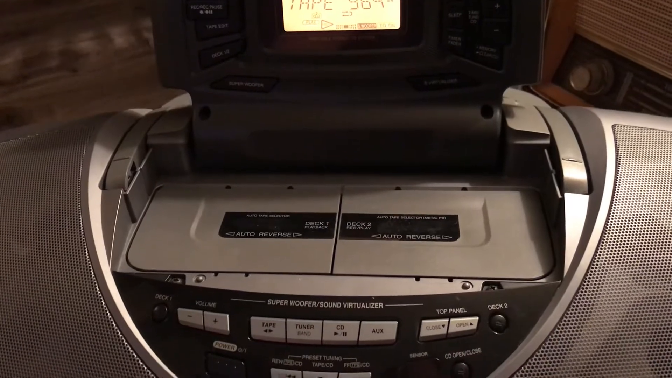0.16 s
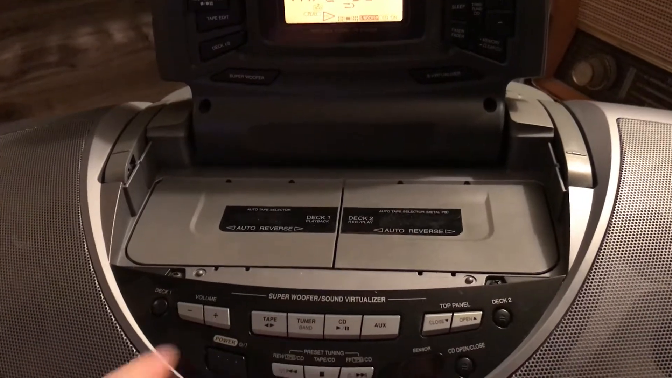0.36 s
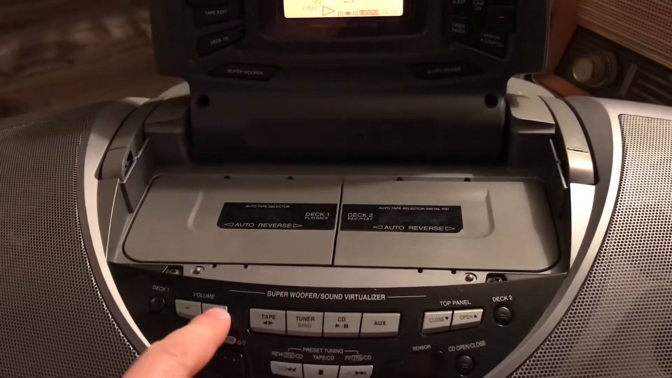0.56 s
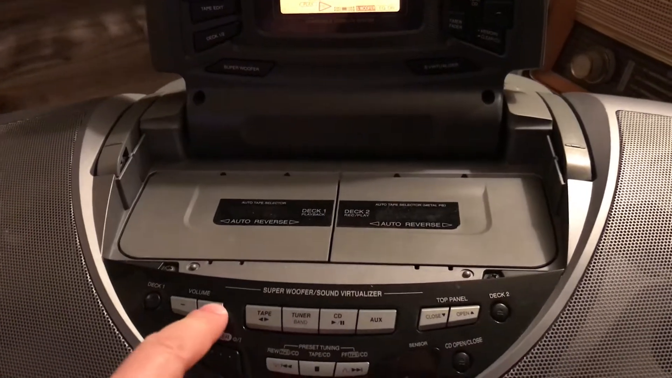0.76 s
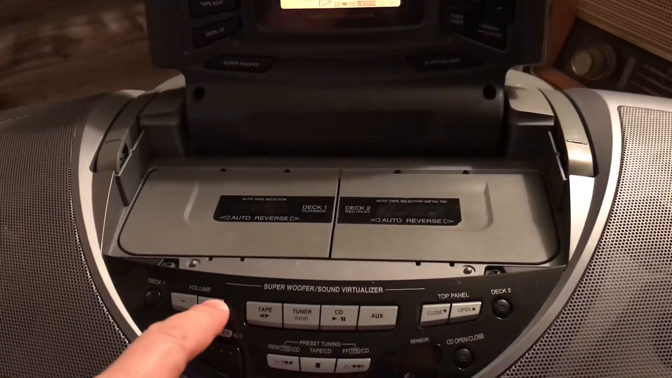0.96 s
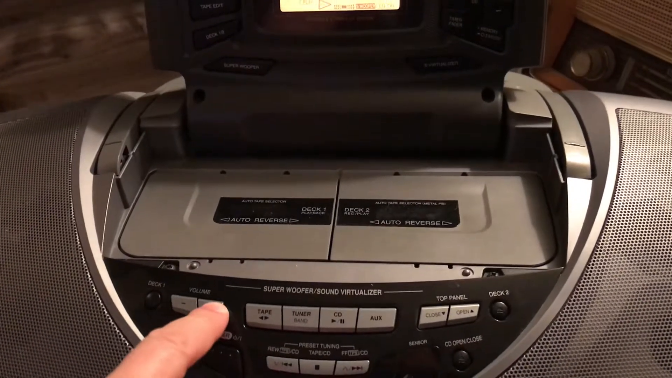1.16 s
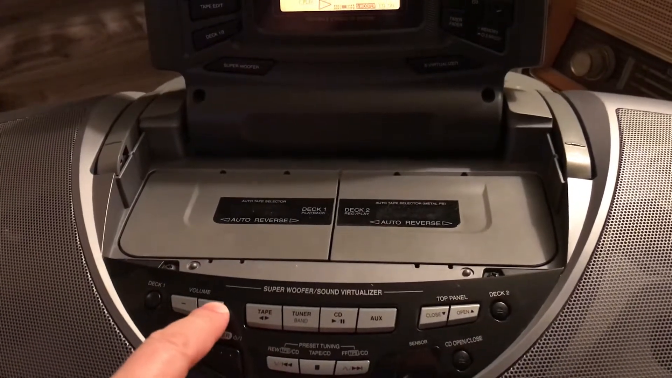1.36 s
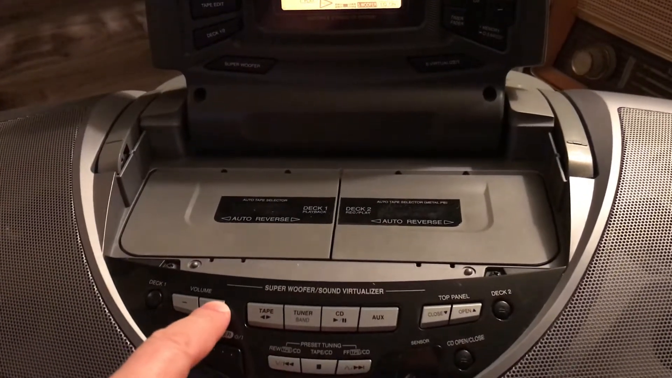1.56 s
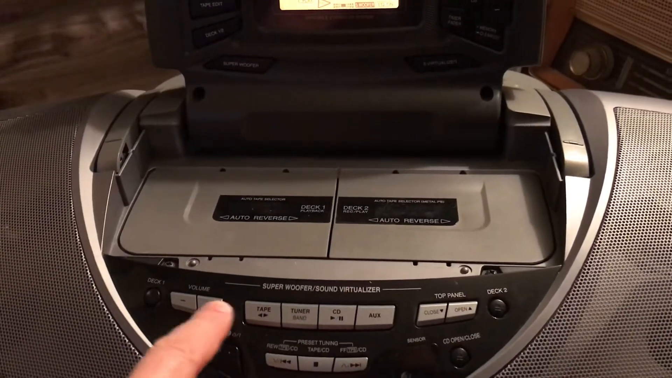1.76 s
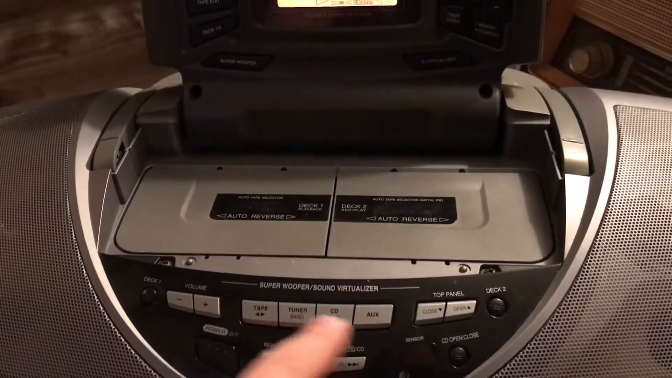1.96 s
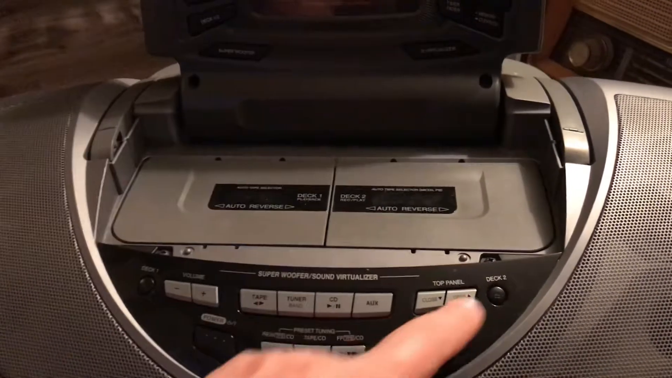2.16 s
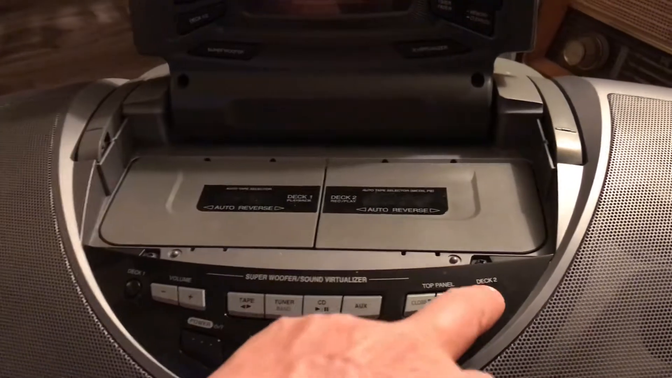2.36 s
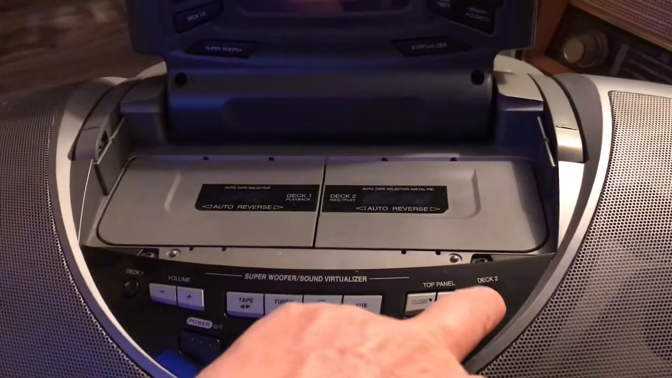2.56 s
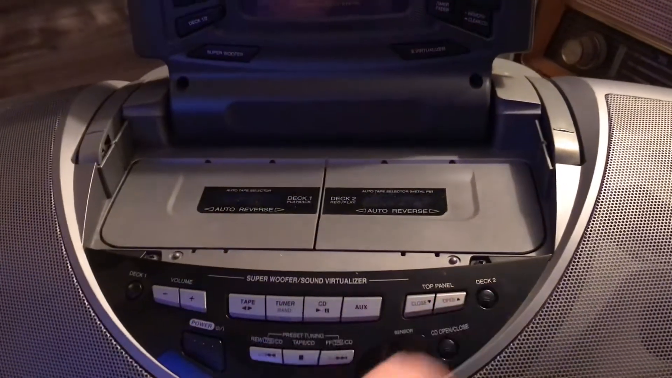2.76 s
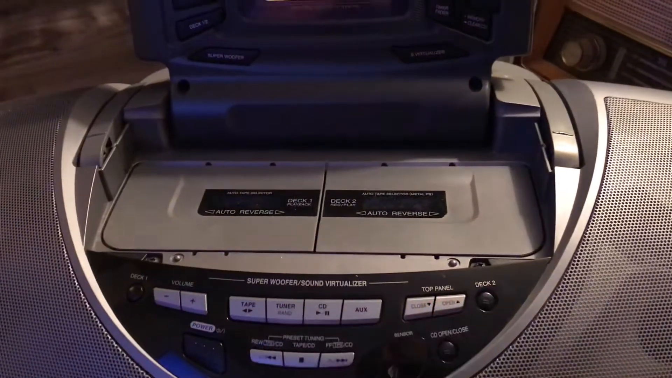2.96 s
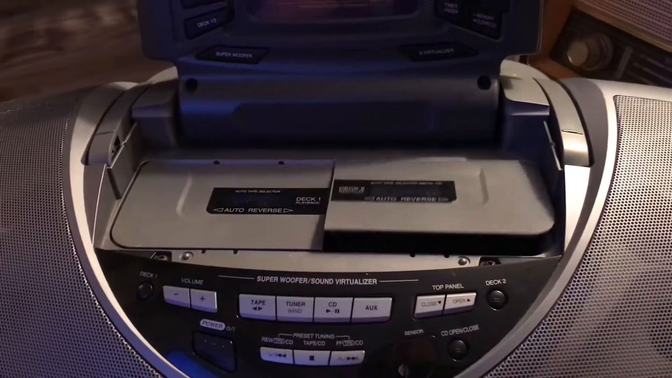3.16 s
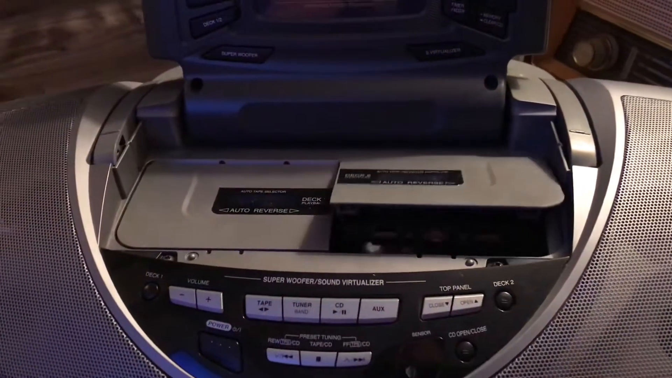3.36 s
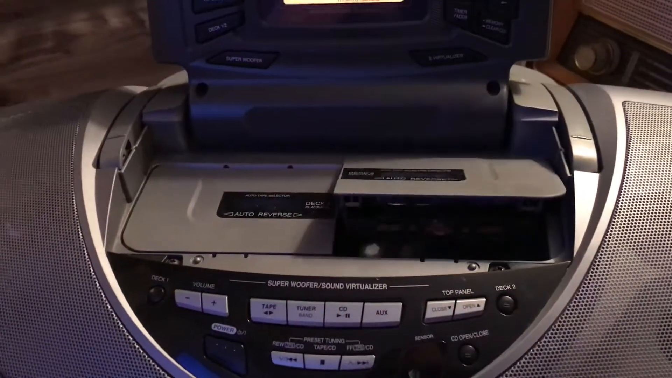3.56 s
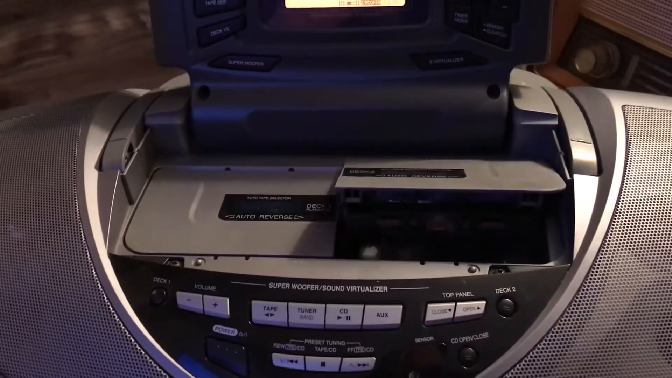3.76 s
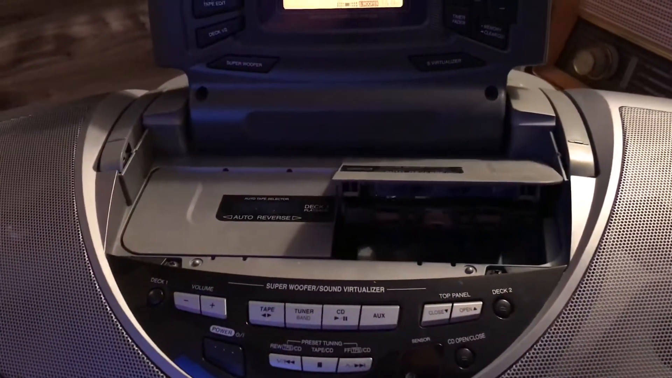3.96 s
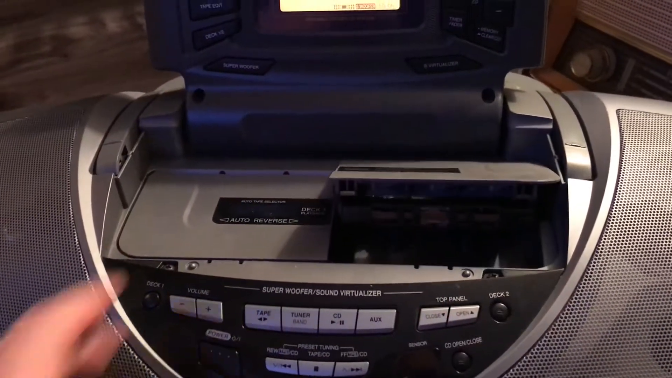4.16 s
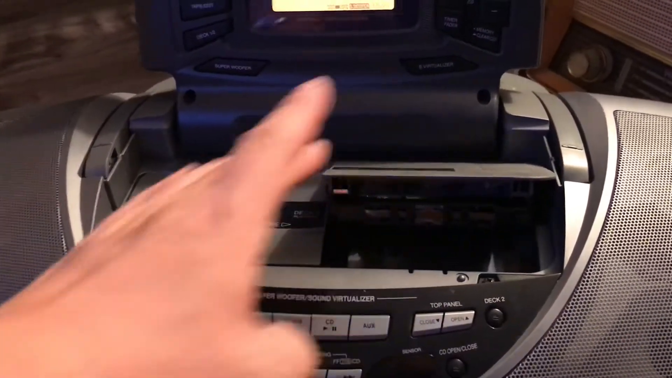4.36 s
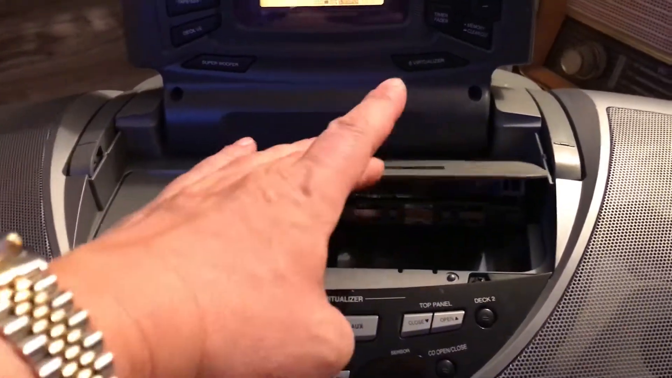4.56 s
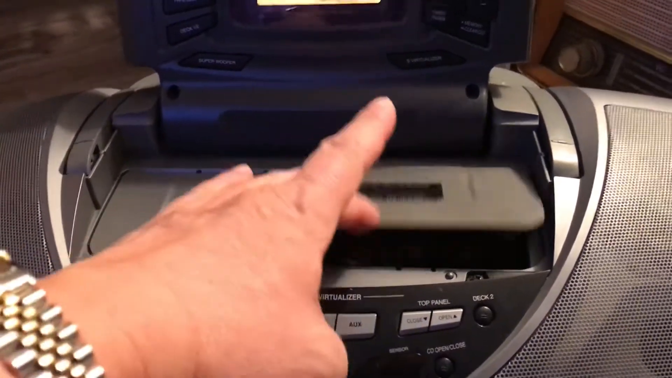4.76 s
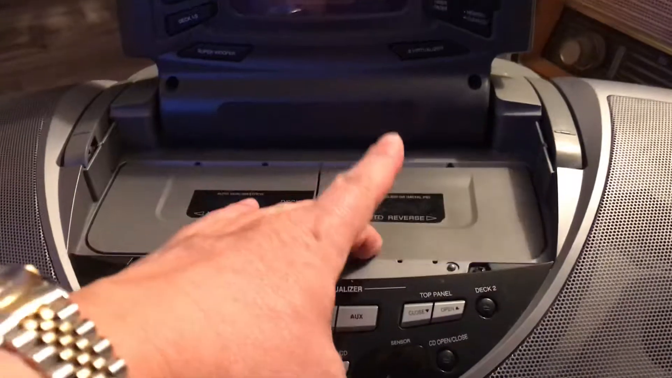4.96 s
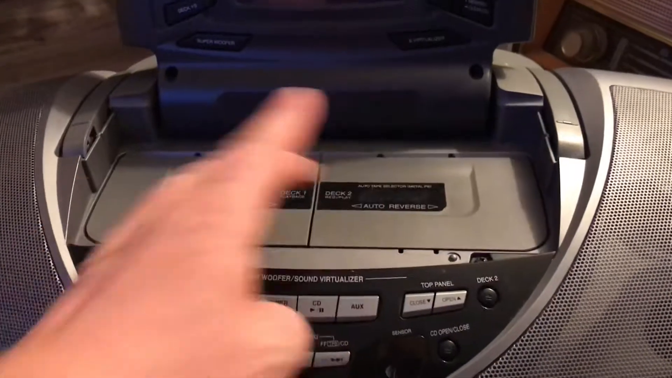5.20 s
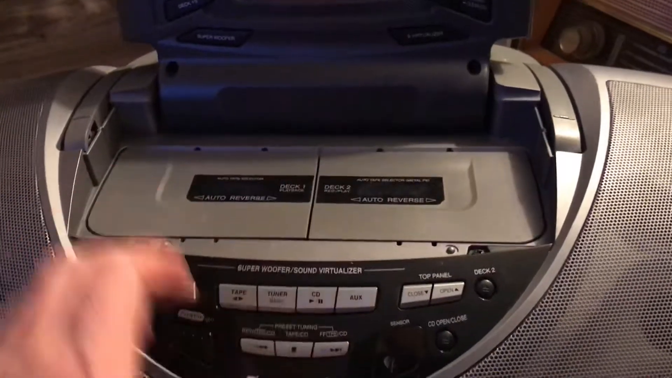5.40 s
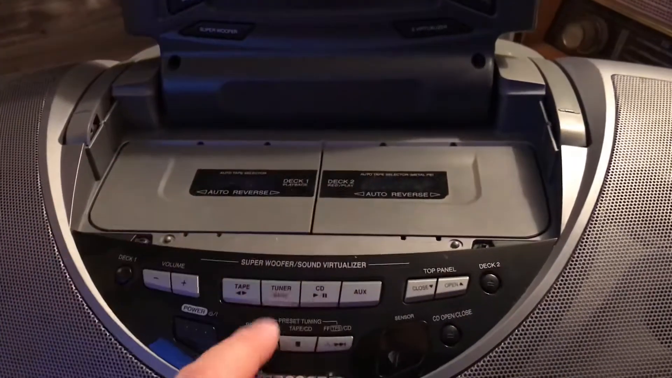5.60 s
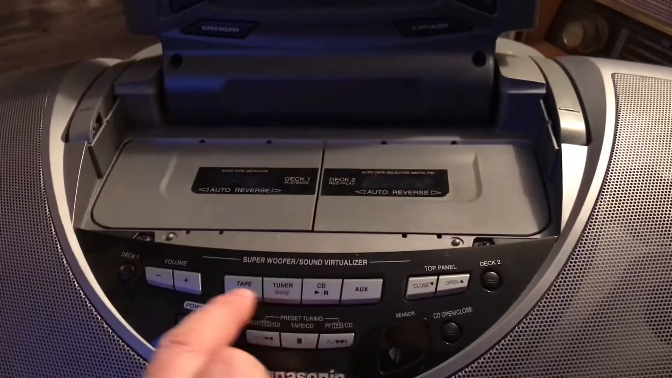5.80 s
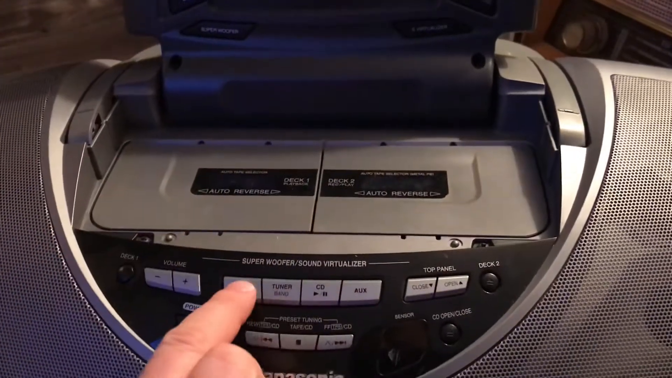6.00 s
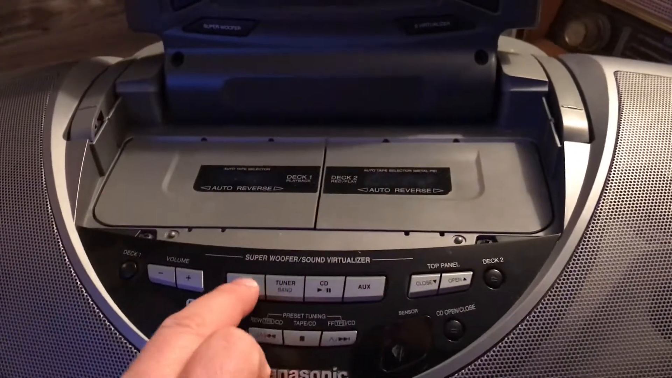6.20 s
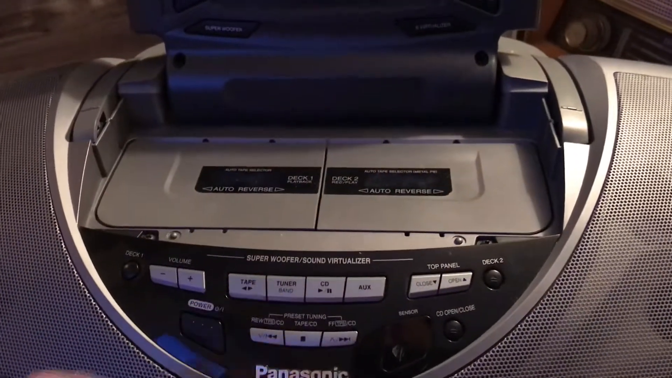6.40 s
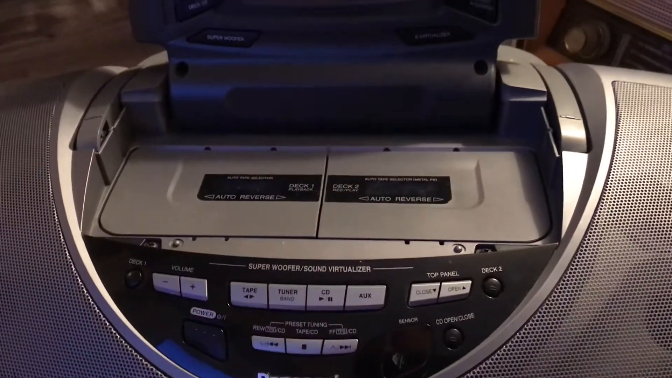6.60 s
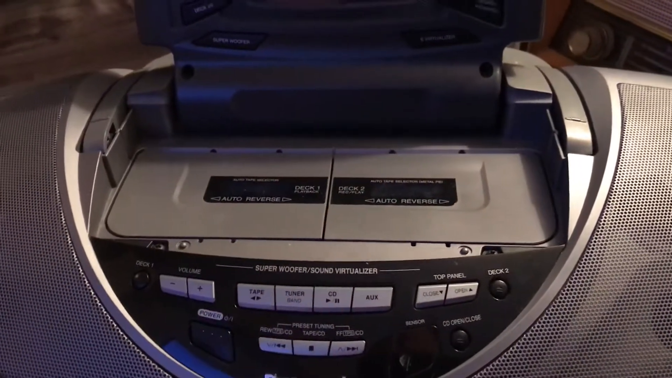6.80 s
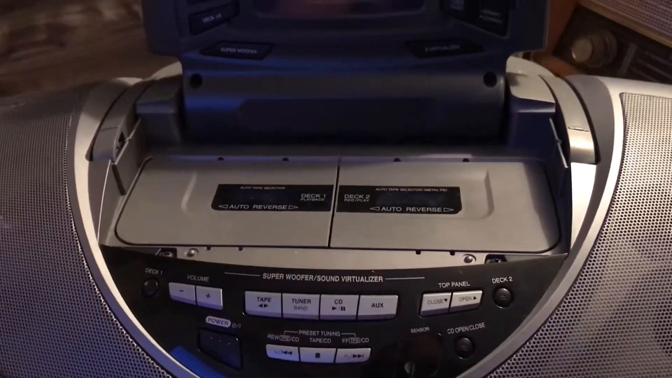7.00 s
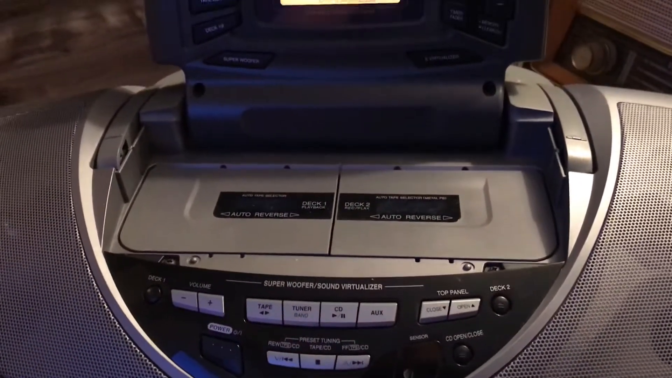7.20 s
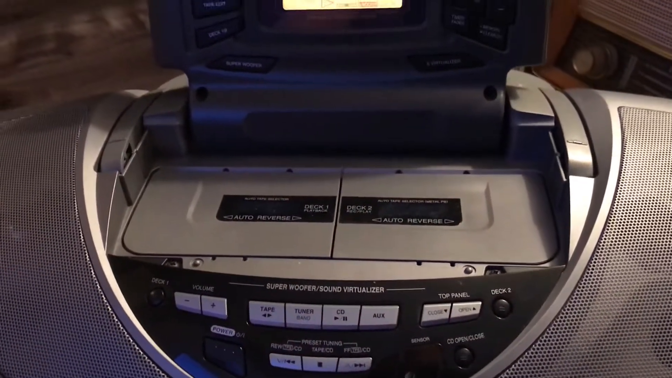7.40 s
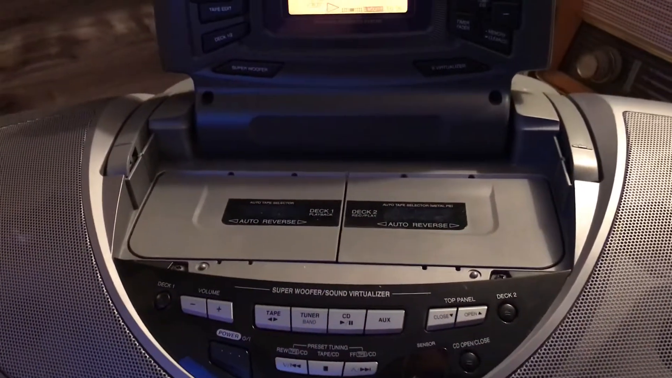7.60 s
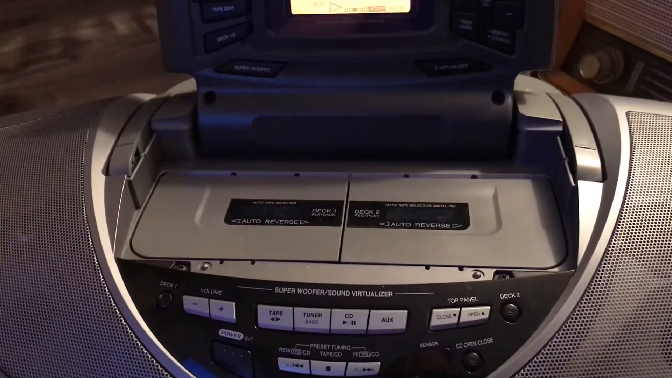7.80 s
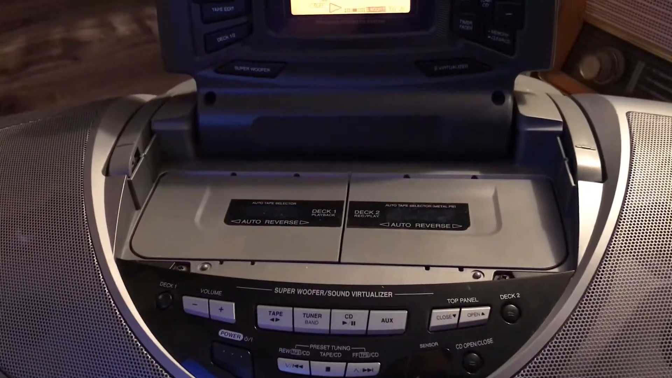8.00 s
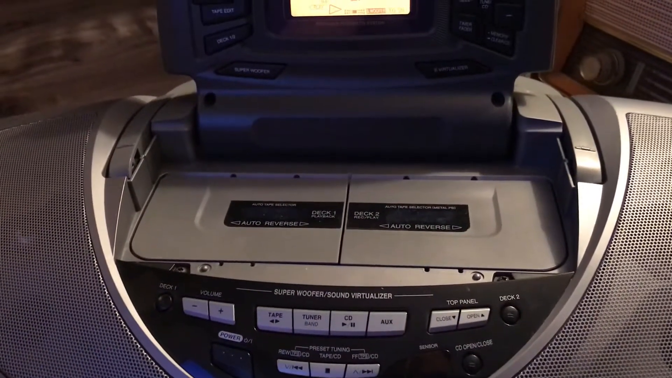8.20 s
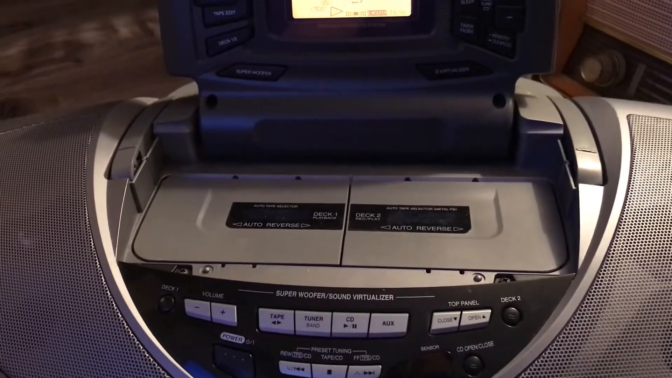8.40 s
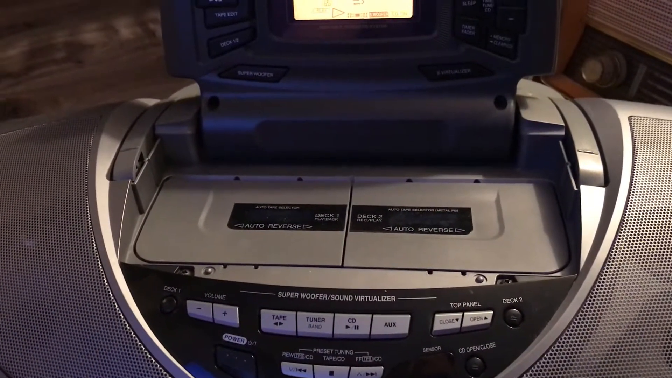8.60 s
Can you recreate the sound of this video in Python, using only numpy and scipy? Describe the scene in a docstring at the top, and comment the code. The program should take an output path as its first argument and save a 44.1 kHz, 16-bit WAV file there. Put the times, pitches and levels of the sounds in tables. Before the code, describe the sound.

A cassette player is heard very close in a small quiet room, with low rumble, a trace of mains hum and faint high tape hiss. A soft finger bump at 0.5 s leads to three small crisp key clicks at about 0.8, 1.1 and 1.3 s, with duller bumps between and after. From 1.8 to 2.3 s a hand rustles lightly over plastic. A key clicks at 2.4 s; the hiss stops near 2.6 s as levers clack and thump in quick irregular succession, with a strong unlatching snap at 3.1 s and the sprung door hitting its stop at 3.3 s. Quiet follows. A tiny brush at 4.5 s, grating from 4.7 s, then a loud sharp door snap at 4.9 s with short echo. Faint taps at 5.1 and 5.5 s. A firm key click at 6.0 s, softer release, and mechanism clunks from 6.3 to 6.6 s. Faint hiss resumes around 6.9 s until the end at about 8.5 s.

```python
"""A portable cassette player, close up in a small room. A finger clicks its panel keys, the tape mechanism
clatters to a stop and unlatches the door, which springs open. A hand brushes the panel and snaps the door
shut, a key is pressed, the mechanism clunks back into play and the running tape hisses faintly.
Each contact is a short ring of pure tones and dying noise, with a room echo. Tape hiss, hand rustle and
room sound are filtered noise, and the room adds a trace of mains hum."""
import sys
import numpy as np
from scipy import signal
from scipy.fft import rfft, irfft, next_fast_len
from scipy.io import wavfile
from scipy.ndimage import uniform_filter1d

SR = 44100
rng = np.random.default_rng(int(sys.argv[2]) if len(sys.argv) > 2 else 0)


def inscribe(sig):
    """Save sig as 16-bit PCM at rate SR to the path in sys.argv[1].

    A 1-D sig is mono; a 2-D sig holds one channel per row.
    Samples are clipped to [-1, 1] before scaling.
    """
    pcm = np.round(np.clip(np.atleast_2d(sig).T, -1, 1) * 32767)
    wavfile.write(sys.argv[1], SR, pcm.astype(np.int16))


N = 381465  # length in samples

# The thud, knock, clack and crack bands of a contact: (low edge [Hz], high edge [Hz])
BANDS = [(90, 400), (400, 1500), (1500, 6000), (6000, 16000)]


def keys():
    """Small switches snap under the panel keys; a finger landing or letting go makes softer bumps."""
    # A switch snaps under a key: (time [s], strength [dB], pitch of the struck part [Hz])
    snaps = [(0.7805, -45.5, 3280), (1.0822, -43.7, 3340), (1.3339, -43.8, 3360), (2.4075, -44.4, 1140),
             (6.0211, -39, 2950)]
    # A finger lands on a key or lets it back up: (time [s], strength [dB], pitch of the struck part [Hz])
    bumps = [(0.5445, -62.5, 1050), (0.9611, -50, 616), (1.2354, -52, 640), (1.5604, -52, 583),
             (2.5525, -46.5, 855), (6.161, -42.7, 462)]
    # Sound of each touch, relative to its strength, with the rise time of a usual blow:
    # (thud [dB], knock [dB], clack [dB], crack [dB], rise [s])
    snap_touch = (-11, -3, -4, -9.5, 0.0003)
    bump_touch = (-4.5, -4, -15, -28, 0.0033)
    # Tones the keys ring with: (pitch [Hz], relative level [dB], time to fall 60 dB [s])
    modes = [(363, -3, 0.15), (576.5, 7.5, 0.094), (740, -20, 0.14), (845, 1.5, 0.13), (1127, 3, 0.14),
             (1825, 6.5, 0.16), (2000, 7.5, 0.023), (2650, -5, 0.089), (3350, -26, .05), (4130, 12, 0.036),
             (5220, -5, .05)]
    # The crowd of weaker tones: (frequency [Hz], relative level [dB per Hz])
    body = [(50, -36), (150, -26), (400, -13), (580, 0), (800, -1.5), (960, -10), (1190, 0), (1600, -7.5),
            (2800, -1), (4200, -11), (6500, -22.5), (10000, -42.5), (14000, -36), (16000, -33.5)]
    blows = [blow(snap_touch, *row) for row in snaps]
    blows += [blow(bump_touch, *row) for row in bumps]
    return contacts(blows, modes, body, modes_db=-8, part_db=-5, rattle_db=1.5,
                    life=1.18, wet_db=-4.0, level_db=-0.6)


def drive():
    """The mechanism shifts its levers to stop, to eject and to play, with hard snaps and soft bumps."""
    # Levers and the door latch snap over:
    # (time [s], strength [dB], pitch of the struck part [Hz], sharpness of the edge [dB])
    snaps = [(2.6565, -59, 5000, 2), (2.6602, -49, 1600, -2.5), (2.684, -55.5, 3170, -6),
             (2.714, -40.5, 3130, 2.3), (2.7335, -52, 3150, -1.5), (2.8586, -48.5, 3100, 0),
             (2.9165, -40.5, 1090, -2), (3.056, -62, 2440, 3), (3.0662, -48.3, 1930, -1),
             (3.0783, -33.3, 1920, -5), (3.1035, -49.5, 3740, 4.5), (3.119, -46, 5500, -3),
             (3.1296, -43.5, 3800, 6.5), (6.2705, -58, 5230, 2), (6.2752, -50.5, 2070, 0),
             (6.2889, -52.5, 1900, -5), (6.3308, -46.3, 4190, 4), (6.3365, -49.3, 2200, 0),
             (6.4847, -60.5, 2460, -8), (6.533, -61.5, 3570, -2.5), (6.5645, -58, 2500, -7),
             (6.5862, -47.8, 3150, 1)]
    # The cam and the head carriage bump into place:
    # (time [s], strength [dB], pitch of the struck part [Hz])
    bumps = [(2.668, -39.5, 1550), (2.735, -44, 1100), (2.8083, -51, 3210), (2.8213, -50, 3160),
             (2.8848, -49, 380), (2.9356, -44, 1140), (2.9965, -43, 1750), (6.277, -47, 300),
             (6.2992, -53, 1050), (6.4127, -47, 555), (6.567, -50, 300), (6.587, -39.5, 320)]
    # Sound of each touch, relative to its strength, with the rise time of a usual blow:
    # (thud [dB], knock [dB], clack [dB], crack [dB], rise [s])
    snap_touch = (-1.8, -1.5, -0.5, -1.5, 0.0022)
    bump_touch = (-1, -7, -12.5, -25, 0.003)
    # Tones the mechanism rings with: (pitch [Hz], relative level [dB], time to fall 60 dB [s])
    modes = [(141, -14, 0.23), (193, -6, 0.13), (314, -2, 0.15), (379.6, -2, 0.2), (567, -0.5, 0.11),
             (718, 0.5, 0.053), (1230, -29, .09), (1410, -26, .08), (1910, -3.5, .05), (2490, 0, 0.038),
             (3180, -10, 0.025), (3710, -4, 0.025), (5100, -11, .03)]
    # The crowd of weaker tones: (frequency [Hz], relative level [dB per Hz])
    body = [(40, -24), (85, -9), (130, 13), (350, 7.5), (700, -3), (1200, -1.5), (2200, -5), (3600, -6.5),
            (6000, -12), (8000, -18.5), (13500, -19), (16000, -30)]
    blows = [blow(snap_touch, *row) for row in snaps]
    blows += [blow(bump_touch, *row) for row in bumps]
    return contacts(blows, modes, body, modes_db=-4.5, part_db=2, rattle_db=1.5,
                    life=1.0, wet_db=0.3, level_db=-0.43)


def door():
    """The sprung door and its latch snap and grate; the hand bumping the door is softer."""
    # The door hits its stop, grates on the way down, snaps shut and is let go:
    # (time [s], strength [dB], pitch of the struck part [Hz], sharpness of the edge [dB])
    snaps = [(3.2605, -56.5, 3670, -4), (3.2678, -41.5, 3750, 4.5), (4.736, -61.5, 3560, -4),
             (4.7598, -44, 3530, -6.5), (4.783, -49.5, 4780, -6), (4.799, -55, 3700, -1),
             (4.8445, -60, 3740, -6), (4.885, -42.8, 3640, -3), (4.8935, -25.5, 3650, -0.5),
             (4.901, -39, 5500, 0), (5.4794, -55.3, 2100, -6.5)]
    # The hand bumps the door and the door settles:
    # (time [s], strength [dB], pitch of the struck part [Hz])
    bumps = [(3.272, -52, 300), (4.429, -67, 1400), (4.7703, -42, 690), (4.7997, -46, 536),
             (5.0865, -53, 570), (5.492, -52, 1200)]
    # Sound of each touch, relative to its strength, with the rise time of a usual blow:
    # (thud [dB], knock [dB], clack [dB], crack [dB], rise [s])
    snap_touch = (-8, -2, 0, -2, 0.0015)
    bump_touch = (0, -4, -8.5, -19, 0.003)
    # Tones the door rings with: (pitch [Hz], relative level [dB], time to fall 60 dB [s])
    modes = [(98, -14, .4), (202.7, -8.5, 0.13), (354.4, -0.5, .17), (561.6, -5, .13), (715.4, -6, .1),
             (877, -10.5, .15), (1150, -5.5, .09), (1303, -6.5, 0.12), (1920, -5.5, .06),
             (2070, -8.5, .055), (2300, -7, 0.0505), (2680, -6.5, 0.045), (2899, -3.5, 0.0475),
             (3590, 4, 0.061), (3850, -3.5, .035), (4650, -3.5, .035), (5295, -5, .035),
             (5652, -9.5, 0.032), (5950, -7, 0.03033)]
    # The crowd of weaker tones: (frequency [Hz], relative level [dB per Hz])
    body = [(40, -20.5), (65, -0.5), (100, 6), (180, -6.5), (330, 6.5), (700, -5), (1500, -3), (2200, 1),
            (3800, -2), (5500, -3), (6800, -13.5), (8500, -15.5), (12000, -16), (16000, -22.5)]
    blows = [blow(snap_touch, *row) for row in snaps]
    blows += [blow(bump_touch, *row) for row in bumps]
    return contacts(blows, modes, body, modes_db=-6, part_db=0.5, rattle_db=1.5,
                    life=1.0, wet_db=-1.1, level_db=0.4)


def blow(touch, start_s, strength_db, part_hz, edge_db=0):
    """One contact as (time, four band levels, rise time, part pitch); stronger blows seat faster."""
    # A sharp edge trades knock for crack: (thud, knock, clack, crack [dB per dB of edge])
    edge_tilt = (0, -1, 0, 1)
    part_lift_db = 4  # the band that holds the pitch of the struck part stands out
    usual_db, haste = -45, 0.4  # strength that seats in the given rise time; power by which others differ
    *colour_db, rise_s = touch
    lift_db = [part_lift_db * (low < part_hz <= high) for low, high in BANDS]
    band_db = strength_db + np.add(colour_db, lift_db) + edge_db * np.array(edge_tilt)
    return (start_s, *band_db, rise_s * amp(haste * (usual_db - strength_db)), part_hz)


def contacts(blows, modes, body, modes_db, part_db, rattle_db, life, wet_db, level_db):
    """Each contact rings the small part that is hit, the modes around it and the case; the room answers."""
    # How long the plastic case rings, before the factor life: (frequency [Hz], time to fall 60 dB [s])
    plastic = [(100, 0.2), (350, .11), (900, .072), (3000, 0.065), (7000, .037), (14000, 0.024)]
    # How long the room rings: (frequency [Hz], time to fall 60 dB [s])
    room = [(100, .55), (400, 0.2), (1500, .44), (4000, 0.35), (8000, .29), (15000, .2)]
    # Colour of the room's answer: (frequency [Hz], relative level [dB])
    room_colour = [(100, -6), (400, -3.5), (1500, -9), (4000, -16), (8000, -14), (15000, -21.5)]
    ring_size, part_q = 16384, 8  # samples in a ring; sharpness of the struck part's resonance
    wall_rise_s = 0.008

    out = np.zeros(N + SR)  # spare room for the last echo
    t = np.arange(ring_size) / SR
    wall_t = np.arange(2 * ring_size) / SR
    hz, mode_db, t60 = np.transpose(modes)[:, :, None]
    ringing = np.sin(2 * np.pi * hz * t) * np.exp(-np.log(1000) * t / t60)
    case_t60s = [(f, life * decay) for f, decay in plastic]

    for start_s, *band_db, rise_s, part_hz in blows:
        # the point of contact decides how strongly, and with which sign, each mode is struck
        signs = rng.choice([-1, 1], hz.shape)
        strength = signs * amp(mode_db + 2.5 * rng.standard_normal(hz.shape))
        tones = unit(np.sum(strength * ringing, axis=0))
        # loose pieces chatter, so the case dies away unevenly
        chatter = amp(rattle_db * flutter(ring_size, smoothing=70))
        crowd = coloured(dying(case_t60s, ring_size) * chatter, body)
        # the part that is hit is well damped: one broad resonance
        part = signal.lfilter(*signal.iirpeak(part_hz, part_q, fs=SR), crowd)
        # parts that slide home build up over a few milliseconds; a switch snaps much faster
        seating = 1 - np.exp(-(t / rise_s) ** 2)
        mixed = unit(crowd + amp(part_db) * part) + amp(modes_db) * tones
        ring = voiced(seating * mixed, band_db)
        # the echo builds up, then dies away
        walls = dying(room, 2 * ring_size) * (1 - np.exp(-wall_t / wall_rise_s))
        sound = amp(wet_db) * signal.fftconvolve(ring, coloured(walls, room_colour))
        sound[:ring_size] += ring
        first = round(start_s * SR)
        out[first:first + len(sound)] += sound
    return amp(level_db) * out[:N]


def tape():
    """The running tape hisses in a few bands, fading out as it stops and in as it reaches speed."""
    # Peaks of the hiss: (centre [Hz], width [Hz], relative level [dB])
    hiss_peaks = [(5470, 640, -3), (8330, 2800, -11), (11180, 950, -2), (12500, 1000, -7.5),
                  (13400, 1400, -11.5)]
    stop_s, start_s, fade_s = 2.62, 6.86, 0.14  # silent at stop_s, starts again at start_s
    level_db = -77.7

    def response(hz):
        power = 0
        for centre, width, db in hiss_peaks:
            power = power + amp(db) ** 2 / (1 + (2 * (hz - centre) / width) ** 2) ** 2
        return np.sqrt(power)

    t = np.arange(N) / SR
    running = np.clip(np.maximum(stop_s - t, t - start_s) / fade_s, 0, 1)
    return amp(level_db) * running * unit(filtered(rng.standard_normal(N), response))


def hand():
    """A faint, grainy rustle as the hand crosses the panel: each stroke rises, holds and dies away."""
    # The hand brushes over the panel: (start [s], length [s], level [dB])
    brushes = [(1.75, 0.2, -75.5), (1.99, 0.11, -72.5), (2.167, 0.115, -65.5), (4.475, 0.03, -68)]
    # Colour of the rustle: (frequency [Hz], relative level [dB per Hz])
    rustle = [(500, 5), (1800, 0), (3500, 1.5), (5500, -0.5), (9000, -10.5), (16000, -18)]
    attack_s, release_s = 0.012, 0.03
    t = np.arange(N) / SR
    strokes = np.zeros(N)
    for start_s, length_s, db in brushes:
        attack = np.clip((t - start_s) / attack_s, 0, 1)
        release = np.exp(-np.maximum(t - start_s - length_s, 0) / release_s)
        strokes += amp(db) * attack * release
    grain = flutter(N, smoothing=130)
    return strokes * unit(amp(3 * grain) * noise(rustle))


def room_tone():
    """Low rumble and hiss as coloured noise, and a trace of mains hum as a sine."""
    # Colour of the room's rumble and hiss: (frequency [Hz], relative level [dB per Hz])
    air = [(15, -56.5), (25, -28), (48, -9), (97, -4), (134, -8.5), (175, -3.5), (236, -11.5), (384, -17.5),
           (427, -22.5), (734, -21.5), (840, -30.5), (1100, -28), (2550, -35.5), (8590, -42),
           (16000, -43.5)]
    air_db, hum_db, hum_hz = -61, -74.5, 60  # levels are rms
    hum = amp(hum_db) * np.sqrt(2) * np.sin(2 * np.pi * hum_hz * np.arange(N) / SR)
    return amp(air_db) * noise(air) + hum


def amp(db):
    """Decibels as a plain factor."""
    return 10 ** (np.asarray(db) / 20)


def unit(x):
    """Scaled to rms 1."""
    return x / np.sqrt(np.mean(x ** 2) + 1e-20)


def along(points, hz):
    """Reads a curve of (Hz, value) points on a log frequency axis."""
    f, v = np.transpose(points)
    return np.interp(np.log(hz + 1), np.log(f + 1), v)


def filtered(x, response):
    """x with each frequency multiplied by response(Hz)."""
    size = next_fast_len(len(x) + SR // 4)
    return irfft(rfft(x, size) * response(np.fft.rfftfreq(size, 1 / SR)), size)[:len(x)]


def noise(spectrum):
    """Steady noise of rms 1 with the given colour."""
    return unit(filtered(rng.standard_normal(N), lambda hz: amp(along(spectrum, hz))))


def flutter(length, smoothing):
    """A random curve of rms 1, smoothed over the given number of samples."""
    return unit(uniform_filter1d(rng.standard_normal(length), size=smoothing))


def coloured(x, spectrum):
    """Causal colouring, so that nothing sounds before a blow."""
    size = 2 * len(x)
    # folding the cepstrum (the spectrum of the log spectrum) forward in time makes the filter causal
    cepstrum = irfft(np.log(amp(along(spectrum, np.fft.rfftfreq(size, 1 / SR)))))
    cepstrum[1:size // 2] *= 2
    cepstrum[size // 2 + 1:] = 0
    return irfft(rfft(x, size) * np.exp(rfft(cepstrum)))[:len(x)]


def dying(t60s, size):
    """A burst of noise with equal energy at all frequencies, each dying at its own speed."""
    hz, t, cells = signal.stft(rng.standard_normal(size), SR, nperseg=128)
    t60 = along(t60s, hz)[:, None]
    decay = 10 ** (-3 * t / t60) / np.sqrt(t60)
    burst = signal.istft(cells * decay, SR)[1][:size]
    return burst / np.linalg.norm(burst)


def voiced(ring, band_db):
    """Tilts a ring, in two passes, to bring each band to its strength, as rms over 10 ms."""
    hz = np.fft.rfftfreq(len(ring), 1 / SR)
    centres = np.sqrt(np.prod(BANDS, axis=1))
    for _ in range(2):
        power = 2 * abs(rfft(ring)) ** 2 / len(ring) / (0.01 * SR)
        held_db = [10 * np.log10(power[(hz > low) & (hz < high)].sum()) for low, high in BANDS]
        ring = coloured(ring, np.column_stack([centres, np.subtract(band_db, held_db)]))
    return ring


def scene():
    """The player, the hand and the room added together, as one channel."""
    player = keys() + drive() + door() + tape()
    return (player + hand() + room_tone())[None]


def record(dry):
    """The recorder drops the deepest bass and keeps next to nothing above its band limit."""
    low_cut_hz, top_hz = 43.3, 15900
    low_cut = signal.butter(N=4, Wn=low_cut_hz, btype="high", fs=SR, output="sos")
    thinned = signal.sosfilt(low_cut, dry)

    def band_limit(hz):
        return 1 / np.sqrt(1 + (hz / top_hz) ** 160)

    return np.array([filtered(channel, band_limit) for channel in thinned])


dry = scene()
out = record(dry)
inscribe(out)
```